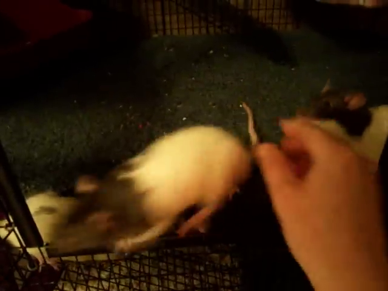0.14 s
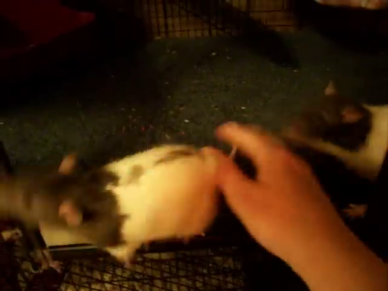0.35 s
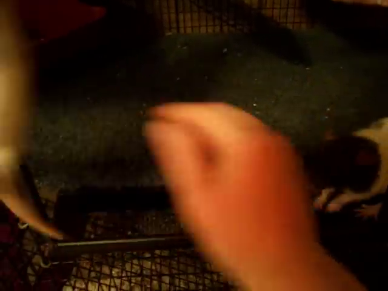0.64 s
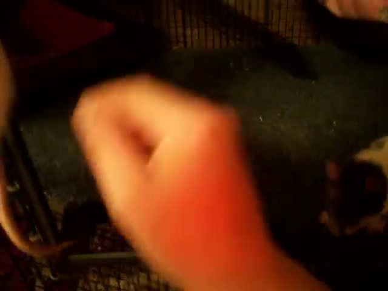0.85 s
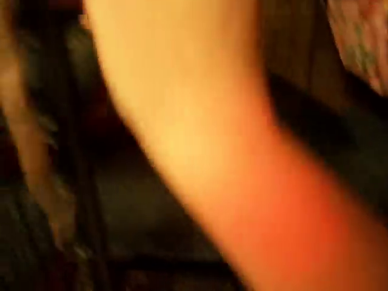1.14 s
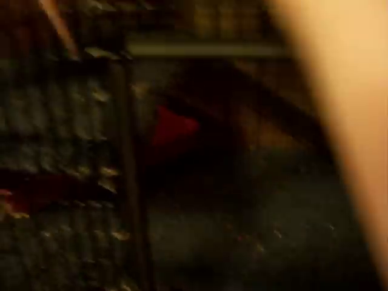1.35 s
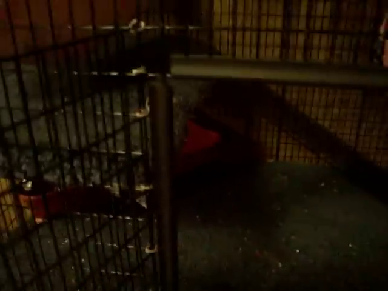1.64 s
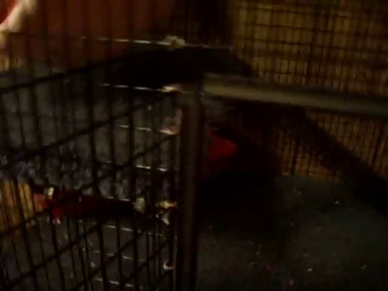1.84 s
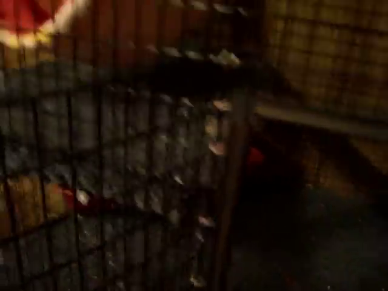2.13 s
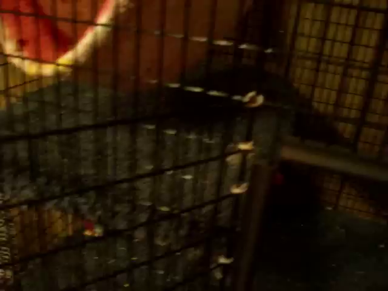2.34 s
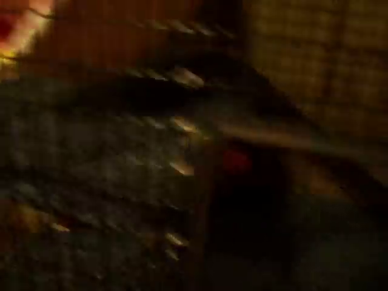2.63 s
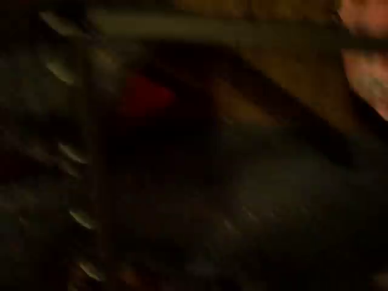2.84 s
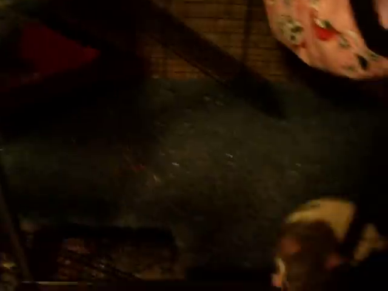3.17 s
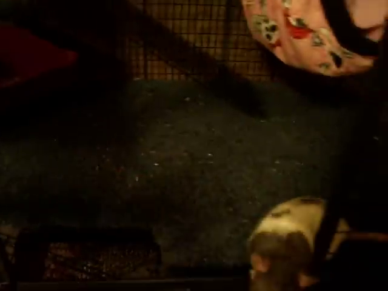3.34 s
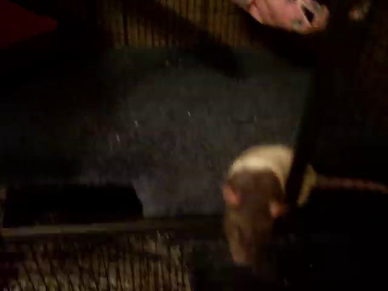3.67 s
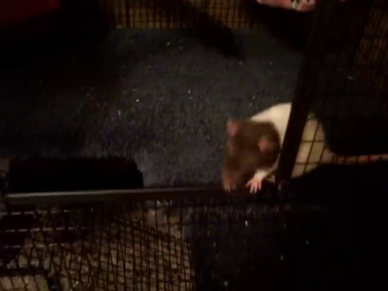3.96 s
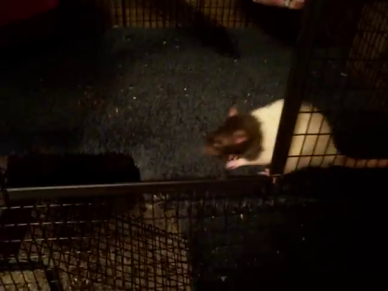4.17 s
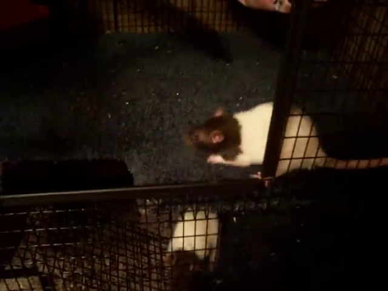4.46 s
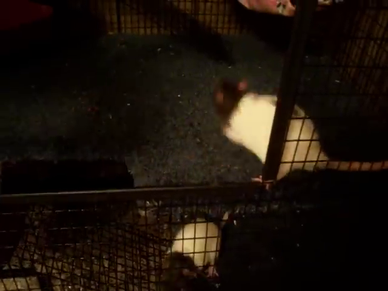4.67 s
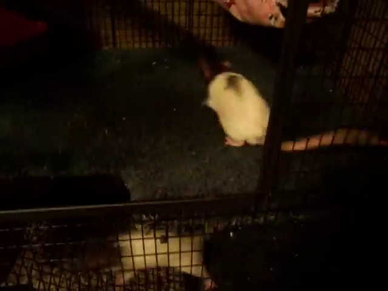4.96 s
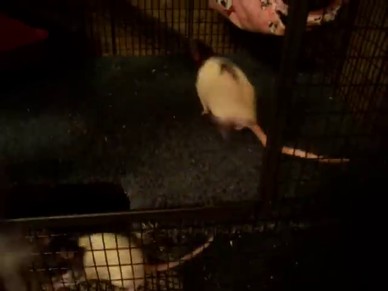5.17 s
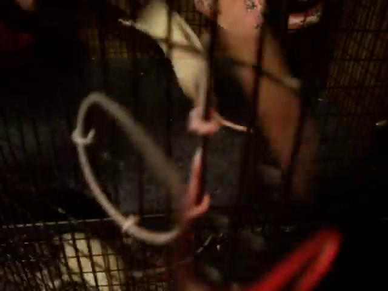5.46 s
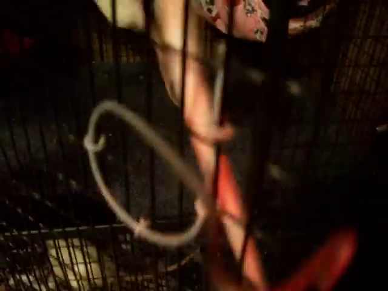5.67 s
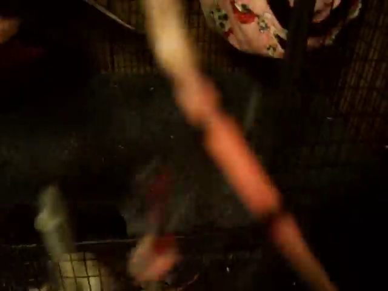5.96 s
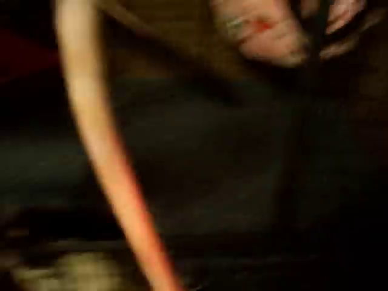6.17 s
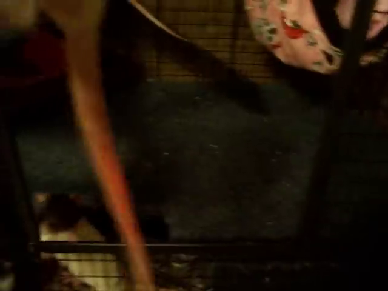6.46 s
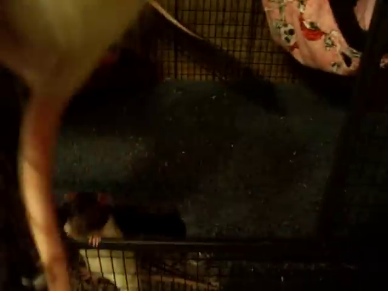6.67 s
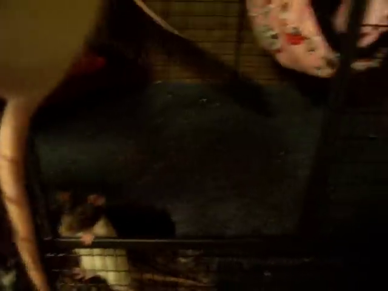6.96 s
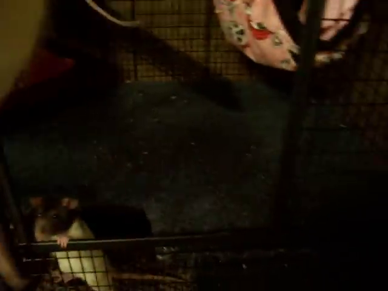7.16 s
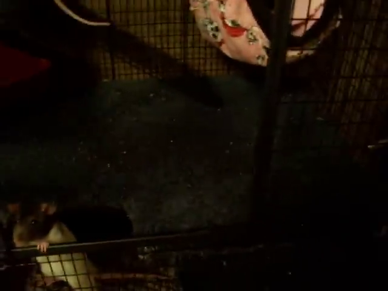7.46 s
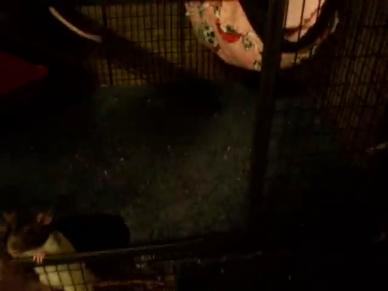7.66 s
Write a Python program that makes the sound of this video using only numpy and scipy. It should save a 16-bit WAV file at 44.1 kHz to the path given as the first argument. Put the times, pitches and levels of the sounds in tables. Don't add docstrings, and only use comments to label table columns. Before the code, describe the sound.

A steady low fan hum with soft airy hiss, a thin mid-pitched buzz and a faint high whine runs throughout, heard through a small, slightly dull handheld microphone indoors. From 0 to 1 seconds, rat claws scuff lightly on cage wire; between 1.1 and 1.5 they scrabble faster, with bright metallic scratches. Hollow taps follow at 1.65 and, sharper, 1.94. A soft landing thud at 2.4 leads into ledge scuffs and clacks, with a loud clank at 2.9. A scrape comes at 3.87, sparse ticks around it, then a very sharp hollow knock at 4.47 with a brief metallic ring. Small ticks and a scuff at 5.6 precede a hard, clipped blow at 6.13, rattling for under a tenth of a second. Everything then ducks in level and partly recovers, with a deep thump at 6.6, a dull thud at 7.19 and faint claw ticks until the end at about 7.8.

```python
import sys
import numpy as np
from scipy import signal
from scipy.fft import rfft, irfft
from scipy.io import wavfile
from scipy.ndimage import uniform_filter1d

SR = 44100
rng = np.random.default_rng(int(sys.argv[2]) if len(sys.argv) > 2 else 0)


def elevation(decibels):
    levels = np.asarray(decibels, float)
    return 10 ** (levels / 20)


def unload_wav(signal):
    wavfile.write(
        sys.argv[1],
        SR,
        np.round(np.clip(np.atleast_2d(signal).T, -1, 1) * 32767).astype(np.int16),
    )


N = 344480

BLOW_S = 6.1347
# (t/s, hiss level/dB)
FACING = [(0, 0.5), (2, 1.5), (2.8, 0.5), (3.1, -3), (4, -1), (5.2, -1.5), (6, -0.5), (7.81, -2.5)]
# (f/Hz, width/Hz, level/dB)
THICK_WIRES = [(4830, 1950, 4.5), (3740, 460, -8)]
# (f/Hz, width/Hz, level/dB)
THIN_WIRES = [(6020, 1600, -1.5), (7000, 1800, -4.5)]


def evened(x):
    return x / np.sqrt(np.mean(x ** 2) + 1e-20)


def add(mix, s, sound):
    part = mix[round(s * SR):][:len(sound)]
    part += sound[:len(part)]


def curve(rows, order):
    rows = np.array(rows)
    return np.interp(np.arange(N) / SR, rows[:, 0], rows[:, order])


def resonate(x, hz, width):
    r = np.exp(-np.pi * width / SR)
    if np.ndim(hz) == 0:
        return 2 * signal.lfilter([1 - r], [1, -r * np.exp(2j * np.pi * hz / SR)], x).real
    turn = np.exp(2j * np.pi * np.cumsum(hz) / SR)
    return 2 * (turn * signal.lfilter([1 - r], [1, -r], x / turn)).real


def body(x, modes):
    total = 0
    for hz, width, db in modes:
        total = total + elevation(db) * resonate(resonate(x, hz, width), hz, width)
    return evened(total)


def drift(seconds):
    size = max(round(seconds * SR), 2)
    smooth = uniform_filter1d(rng.standard_normal(N), size)
    return evened(uniform_filter1d(smooth, size))


def ring(hz, db, t60, rise=0.00021):
    t = np.arange(round(t60 * SR) + 50) / SR
    return elevation(db - 60 * t / t60) * (1 - np.exp(-t / rise)) * np.sin(2 * np.pi * hz * t)


def stroke(rise, fade, touch_db, bend):
    t = np.arange(round((rise + 1.5 * fade) * SR) + 9) / SR
    swell_db = touch_db * np.maximum(1 - t / rise, 0)
    fade_db = -25 * np.maximum((t - rise) / fade, 0) ** bend
    soft_start_db = 20 * np.log10(np.clip(t / .001, 1e-3, 1))
    return swell_db + fade_db + soft_start_db


def rumble_gain():
    sinking_db = -0.68 - 0.1038 * np.arange(N) / SR
    return elevation(sinking_db + 0.13 * curve(FACING, order=1))


def air():
    # (f/Hz, level/dB per Hz)
    air_colour = [(12, -54.5), (20, -21.5), (40, 4), (101, -8.5), (271, -15.5), (300, -11.5), (417, -16),
                  (806, -24), (1040, -28), (1440, -30), (2220, -31), (3410, -38), (5380, -34),
                  (5960, -30.5), (8490, -42.5), (11000, -87), (18700, -120)]
    f, db = np.transpose(air_colour)
    hz = np.fft.rfftfreq(N, 1 / SR)
    colour_db = np.interp(np.log(hz + 1), np.log(f + 1), db)
    noise = rfft(rng.standard_normal(N)) * elevation(colour_db)
    noise /= np.std(irfft(noise * (hz > 300), N))
    low = 1 / (1 + (hz / 900) ** 2)
    rumble = irfft(noise * low, N) * rumble_gain()
    hiss = irfft(noise * (1 - low), N) * elevation(curve(FACING, order=1) + 0.92 * drift(0.033))
    return elevation(-45.5) * (rumble + hiss)


def fan():
    # (multiple of shaft speed, level/dB)
    hum_tones = [(1.73, -38), (3, -39.5), (4, -40), (5, -47.5), (6, -51), (7, -55.5), (8, -50.5), (9, -53),
                 (10, -62.5), (12, -54), (14, -56), (17, -62)]
    # (f/Hz, width/Hz, level/dB)
    room_booms = [(27, 12, -46), (52.3, 10.2, -36.5), (89.7, 4.4, -42), (101.6, 4.3, -48), (205.6, 12, -54)]
    shaft_hz = 29.77
    turns = np.cumsum(shaft_hz * (1 + 0.00404 * drift(0.45))) / SR
    tones, boom = np.zeros(N), np.zeros(N)
    for multiple, db in hum_tones:
        tones += elevation(db + 1.9 * drift(.15)) * np.sin(2 * np.pi * (multiple * turns + rng.random()))
    for hz, width, db in room_booms:
        boom += elevation(db) * body(rng.standard_normal(N), [(hz, width, 0)])
    return (np.sqrt(2) * tones + boom) * rumble_gain()


def camera():
    # (t/s, f/Hz, level/dB)
    grip = [(0, 1050, -0.5), (.7, 1063, 0.5), (1.5, 1098, -.5), (2.3, 1120, -2), (3, 1085, -0.5),
            (3.7, 1046, 1), (4.8, 1029, 0), (6, 1028, 0), (6.4, 1037, -1), (7.81, 1038, -1.5)]
    # (f/Hz, level/dB)
    whines = [(5821.3, -53), (6853, -71)]
    buzz_hz, smear = 50.81, 0.11
    t = np.arange(N) / SR
    knots = np.linspace(0, t[-1], num=14)
    pulses = np.zeros(N)
    for k in range(14, 32):
        wander = np.interp(t, knots, elevation(2.1 * rng.standard_normal(len(knots))))
        pulses += wander * np.cos(2 * np.pi * (k * buzz_hz * t + smear * (k - 21) ** 2))
    casing = body(pulses, [(curve(grip, order=1), 130, 0)])
    upper_db = -6.5 - 22.5 * np.exp(-t / 2.4)
    upper = elevation(upper_db) * body(pulses, [(1282, 56, 0)])
    whine = np.zeros(N)
    for hz, db in whines:
        whine += elevation(db + 0.58 * drift(.02)) * np.sin(2 * np.pi * hz * t + 0.14 * drift(0.014))
    return elevation(-53 + curve(grip, order=2)) * (casing + upper) + np.sqrt(2) * whine


def scuffs():
    # (start t/s, rise/s, fade/s, peak level/dB, thick over thin/dB)
    wire_scuffs = [(.06, 0.013, 0.13, -49.5, 2.5), (.48, .014, .05, -50.5, 4),
                   (.54, .011, .012, -39, -7.5), (.605, 0.0063, 0.097, -38, -2),
                   (.685, .01, 0.041, -36, -6.5), (.98, .15, .02, -49.5, -3.5),
                   (1.13, 0.0086, .04, -40.5, 0.5), (1.15, .003, .02, -35.5, -4.5),
                   (1.163, .006, 0.034, -39.5, -2), (1.19, 0.0087, .05, -37.5, -2),
                   (1.225, 0.0037, 0.026, -29, -9), (1.234, .005, .07, -28.5, -22),
                   (1.27, 0.033, 0.12, -46, -1), (1.35, 0.052, .04, -48.5, 0),
                   (1.416, 0.0075, 0.035, -25, -12), (1.43, 0.018, 0.074, -31, -8),
                   (1.48, 0.031, 0.19, -48.5, 3.5), (1.55, .02, 0.15, -49, 0),
                   (1.64, 0.055, 0.25, -48, -2),
                   (2.437, 0.04, .09, -44, 2), (2.556, .045, .03, -51, 3), (2.62, .012, 0.071, -40, 3),
                    (2.69, .02, .08, -46.5, 0.5), (2.8, .07, .02, -47.5, -0.5),
                    (2.87, .014, 0.027, -41.5, 1), (2.905, 0.0041, 0.036, -40, -3),
                    (2.92, .048, .012, -50, 4), (3.865, 0.0091, .12, -34, -6.5),
                    (5.13, 0.014, .03, -49.5, -9), (5.603, .016, 0.064, -37, -5.5),
                    (7.335, .008, .03, -48, -8), (7.15, .01, .08, -54, -5), (7.478, 0.0044, 0.016, -48, -2),
                    (7.495, .008, 0.036, -44.5, -8), (7.775, .012, .01, -48, -4)]
    # (start t/s, rise/s, fade/s, peak level/dB, hollow f/Hz)
    ledge_scuffs = [(.405, 0.038, .09, -46.5, 1950), (2.4, 0.034, .02, -49, 2400),
                    (1.35, 0.057, .03, -47, 2650), (2.437, 0.032, 0.082, -39, 2400),
                    (2.556, .045, .03, -44, 2600), (2.615, 0.013, 0.045, -32, 2480),
                    (2.665, .07, .07, -43.5, 2490), (2.784, 0.067, 0.018, -46.5, 2420),
                    (2.869, .014, 0.033, -34.5, 2400), (2.909, .02, 0.075, -40.5, 2400),
                    (3.12, 0.06, .07, -48.5, 2420), (3.865, 0.0084, 0.045, -48, 1940)]
    # (start t/s, rise/s, fade/s, peak level/dB, centre f/Hz)
    tray_scuffs = [(.41, 0.043, 0.11, -48, 1450), (.605, .02, 0.097, -41.5, 555),
                   (.605, .015, .05, -47, 1200), (1.14, .01, .05, -47, 1900), (1.33, .04, .05, -48, 3400),
                   (1.42, 0.033, 0.089, -44, 596), (1.43, .04, .07, -44.5, 2280),
                   (2.885, 0.0091, 0.034, -37, 910), (2.95, .015, 0.023, -42.5, 1300),
                   (3.865, 0.018, .1, -46.5, 1500), (5.6, .01, .05, -48.5, 895),
                   (6.49, .02, .12, -53, 1700), (7.24, .03, .05, -54, 1800)]
    # (f/Hz, width/Hz, level/dB)
    cage_frame = [(3400, 2600, 0)]
    slips = rng.standard_normal(N) * elevation(2.0 * drift(0.00072) + 1.4 * drift(0.0085))
    thin, thick = body(slips, THIN_WIRES), body(slips, THICK_WIRES)
    tray = body(slips, [(504, 600, 5), (1200, 1050, -8.0)])
    frame = body(slips, cage_frame)
    out = np.zeros(N)
    for s, rise, fade, peak_db, thick_db in wire_scuffs:
        shape_db = stroke(rise, fade, touch_db=-8.5, bend=1)
        at = round(s * SR) + np.arange(len(shape_db))
        wires = thin[at] + elevation(thick_db) * thick[at] + elevation(-13.5) * frame[at]
        tray_db = -50.5 + 0.44 * (peak_db + 32)
        out[at] += elevation(shape_db) * (elevation(peak_db) * wires + elevation(tray_db) * tray[at])
    for s, rise, fade, peak_db, hollow_hz in ledge_scuffs:
        shape_db = stroke(rise, fade, touch_db=-6.5, bend=2)
        at = round(s * SR) + np.arange(len(shape_db))
        hollow = body(slips[at], [(hollow_hz, 700, 0), (0.74 * hollow_hz, 900, -13.5)])
        out[at] += elevation(peak_db + shape_db) * (hollow + elevation(-15.5) * thick[at])
    for s, rise, fade, peak_db, hz in tray_scuffs:
        shape_db = stroke(rise, fade, touch_db=-6.5, bend=2)
        at = round(s * SR) + np.arange(len(shape_db))
        out[at] += elevation(peak_db + shape_db) * body(slips[at], [(hz, 0.99 * hz, 0)])
    return out


def tick(hollow_db, hollow_hz, thick_db, thin_db):
    t = np.arange(1500) / SR
    chatter_db = -20.5
    drive = elevation(chatter_db - 4) * rng.standard_normal(len(t)) * np.exp(-t / .004)
    drive[0] = 1
    swelling = resonate(drive, hollow_hz, 1600)
    hollow = body(swelling, [(hollow_hz, 850, 0)])
    hollow = hollow + elevation(-18.0) * body(drive, [(0.66 * hollow_hz, 1300, 0)])
    thick, thin = body(drive, THICK_WIRES), body(drive, THIN_WIRES)
    out = np.zeros(len(t))
    for db, part in (hollow_db, hollow), (thick_db + 4, thick), (thin_db + 6.5, thin):
        out += elevation(db) * part / abs(part).max()
    return out


def claw_ticks():
    # (t/s, peak level/dB, hollow f/Hz, wires against peak/dB)
    ledge_ticks = [(0.3344, -32.5, 2500, -18), (0.774, -31.5, 2560, -26), (0.8742, -39, 2730, -15),
                   (1.647, -23.5, 2600, -12), (1.8296, -37, 2510, -4), (1.9041, -42, 2500, -14),
                   (1.9178, -40, 2760, -5), (1.941, -17.5, 2660, -15.5), (2.3934, -42, 1980, -5),
                   (2.5551, -39, 2750, -5), (2.7048, -39, 2670, -1), (2.9003, -10.5, 2420, -2.5),
                   (3.6198, -32.5, 2110, -1), (3.8675, -33, 1900, -5), (4.0834, -29.5, 2050, -8),
                   (4.4069, -41, 2340, -13), (4.4221, -32, 2330, -21), (4.434, -36, 2200, -25),
                   (4.4656, -7, 2560, -12.5), (6.2602, -35.5, 2760, -22)]
    # (t/s, thick wire level/dB, thin wire level/dB, hollow level/dB, hollow f/Hz)
    wire_ticks = [(.5495, -29, -40, -52, 2200), (1.147, -22, -27.5, -21.5, 2900),
                  (1.1488, -24.5, -18.5, -32, 2900), (1.2382, -43.5, -16, -43, 2300),
                  (2.6134, -13.5, -38, -18.5, 2410), (2.8923, -19.5, -33, -20, 1970),
                  (4.0834, -50, -34, -55, 2300), (4.5544, -42, -42, -49, 2130),
                  (5.0954, -53, -38, -51, 1950), (5.334, -38, -55, -47, 2720),
                  (5.604, -40, -33.5, -55, 2300), (6.0814, -55, -37, -47, 2170),
                  (6.129, -58, -35.5, -55, 2200), (6.2602, -60, -32, -56, 2300),
                  (6.6696, -36, -35, -40, 1930), (6.7434, -37, -63, -57.5, 2250),
                  (7.3374, -61, -45, -44.5, 2220), (7.5, -55, -41, -55, 2060),
                  (7.796, -38, -37.5, -51, 2150)]
    out = np.zeros(N)
    for s, db, hz, wires_db in ledge_ticks:
        add(out, s, tick(db, hz, db + wires_db, db + wires_db - 4.5))
    for s, thick_db, thin_db, hollow_db, hz in wire_ticks:
        add(out, s, tick(hollow_db, hz, thick_db, thin_db))
    return out


def ringing_bars():
    # (t/s, f/Hz, level/dB, time to die by 60 dB/s)
    bar_rings = [
        (4.466, 1060, -27.5, 0.056),
        (4.466, 1370, -28, 0.035),
        (2.901, 1160, -16.5, 0.0094),
        (2.6, 740, -41, 0.034),
        (3, 1500, -44, 0.026),
        (6.8, 600, -57, .12),
        (.63, 520, -35.5, 0.35),
                 (4.467, 2130, -43, .45),
        (4.467, 2780, -50, .25),
        (6.2, 1534, -45, .8),
        (6.2, 3047, -51, .4),
    ]
    out = np.zeros(N)
    for s, hz, db, t60 in bar_rings:
        add(out, s, ring(hz, db, t60))
    return out


def dull_bumps():
    # (t/s, peak level/dB, f/Hz, time to die by 60 dB/s)
    thuds = [
        (2.394, -20, 213, .05),
        (2.394, -21, 690, 0.014),
        (7.188, -19.5, 263, 0.036),
        (6.1348, -3.5, 185, 0.012),
        (6.1346, -8, 450, 0.012),
        (6.6, -18.5, 45, 0.19),
        (6.178, -15, 58, 0.14),
    ]
    out = np.zeros(N)
    for s, db, hz, t60 in thuds:
        add(out, s, ring(hz, db, t60, rise=0.0011))
    return out


def blow():
    # (f/Hz, level/dB, time to die by 60 dB/s)
    blow_rings = [(1030, -20.5, 0.004), (1600, -5, .006), (2050, -5.5, .006), (2500, -5.5, 0.0057),
                  (3080, -6.5, 0.0057), (3700, -7.5, 0.0074), (4920, -8, .005), (6400, -4.5, 0.0046)]
    out = np.zeros(N)
    for hz, db, t60 in blow_rings:
        add(out, BLOW_S + 0.00044 * rng.random(), ring(hz, db, t60))
    return out


def rattle():
    # (t/s, level/dB)
    rattle_level = [
        (6.1364, -16),
        (6.142, -26.5),
        (6.172, -26),
        (6.177, -38),
        (6.18, -26),
        (6.195, -20.5),
        (6.202, -28.5),
        (6.207, -22.5),
        (6.222, -51.5),
    ]
    # (f/Hz, width/Hz, level/dB)
    case_low = [(447, 860, -4), (1020, 830, -8.5), (1500, 1340, -2), (2050, 540, 2.5), (2650, 740, 2.5)]
    # (f/Hz, width/Hz, level/dB)
    case_high = [(3330, 900, -2.5), (4170, 570, 1), (5320, 1500, -6), (6100, 2200, -10), (7350, 1300, -20)]
    s, db = np.transpose(rattle_level)
    t = np.arange(s[0], s[-1], 1 / SR)
    level_db = np.interp(t, s, db)
    chatter = rng.standard_normal(len(t)) * elevation(2.6 * drift(0.0011)[:len(t)])
    bright_db = 1.7 * (level_db + 21.5) - 4.0
    case = body(chatter, case_low) + elevation(bright_db) * body(chatter, case_high)
    out = np.zeros(N)
    add(out, s[0], elevation(level_db) * case)
    return out


def scene():
    # (f/Hz, level/dB)
    port_colour = [(2900, -1), (3250, -2), (3800, -0.5), (7500, 1), (7900, -7.5), (9000, 6.5)]
    f, db = np.transpose(port_colour)
    near = scuffs() + claw_ticks() + ringing_bars() + dull_bumps() + blow() + rattle()
    port_db = np.interp(np.fft.rfftfreq(N, 1 / SR), f, db)
    near = irfft(rfft(near) * elevation(port_db), N)
    return (air() + fan() + camera() + near)[None]


def low_pass(x):
    return signal.sosfilt(signal.butter(12, 16500, fs=SR, output="sos"), x)


def record(dry):
    edge_hz, stop_hz = 7500, 9150
    hz = np.fft.rfftfreq(N, 1 / SR)
    slope_db = -38 * np.clip((hz - edge_hz) / (stop_hz - edge_hz), 0, 1) ** 2.54
    band = irfft(rfft(dry) * elevation(slope_db) * (hz < stop_hz), N)
    duck_db, hold_db, fall_s, back_s = -7.5, -3, 0.12, 0.45
    since = np.maximum(np.arange(N) / SR - BLOW_S, 0)
    back = np.exp(-np.maximum(since - fall_s, 0) / back_s)
    gain_db = np.minimum(since / fall_s, 1) * (hold_db + (duck_db - hold_db) * back)
    mix = np.clip(band * elevation(gain_db), -.72, .72)
    return low_pass(mix)


dry = scene()
out = record(dry)
unload_wav(out)
```